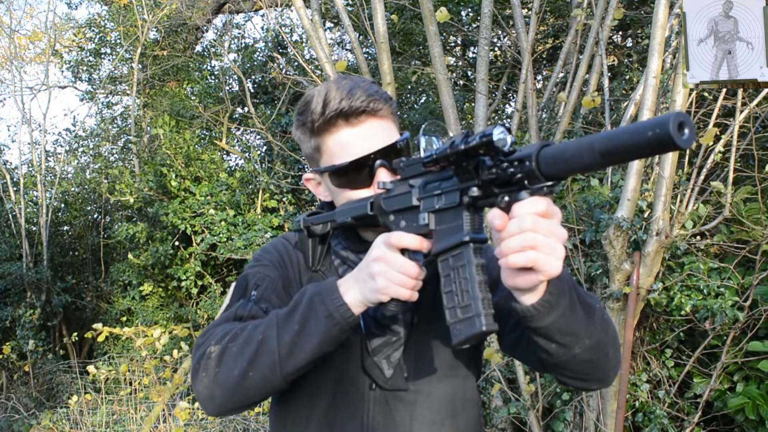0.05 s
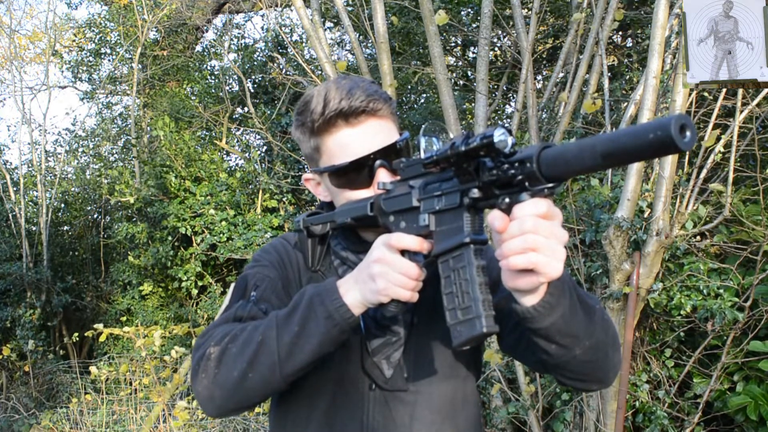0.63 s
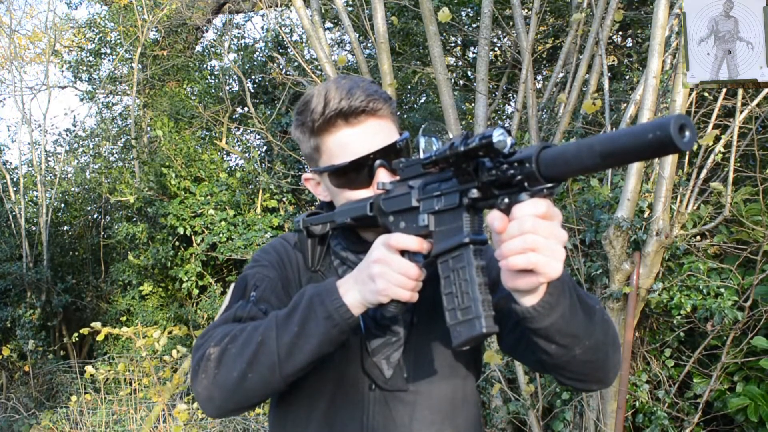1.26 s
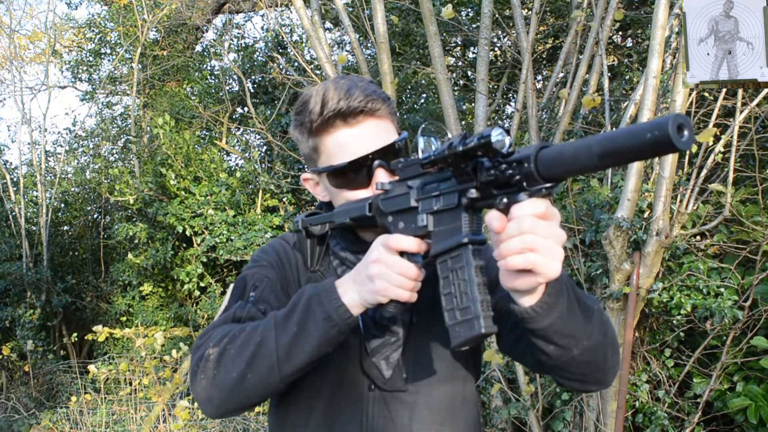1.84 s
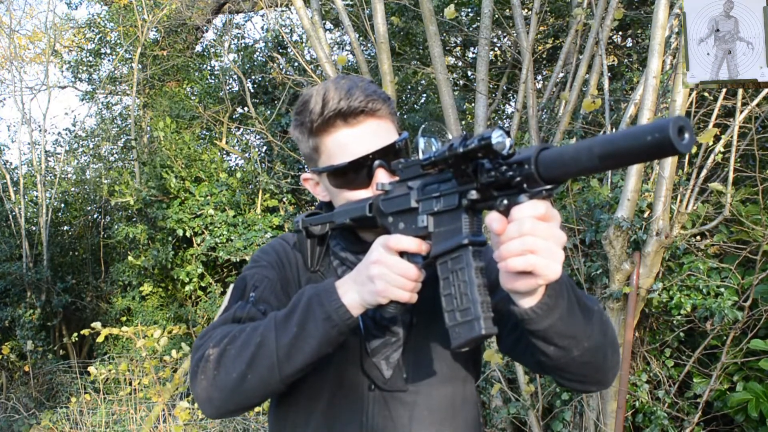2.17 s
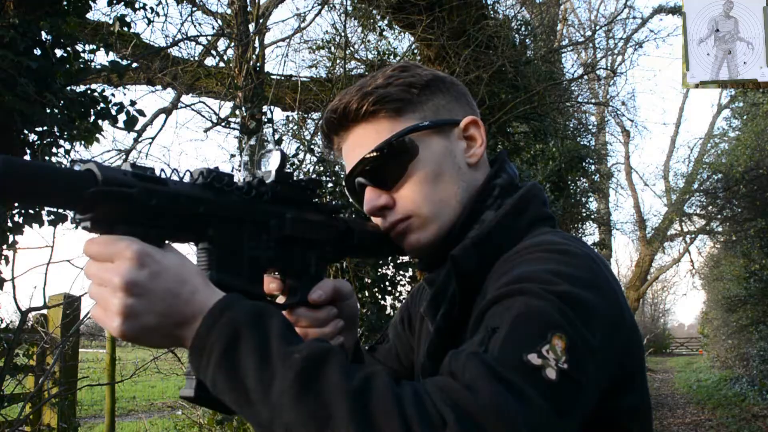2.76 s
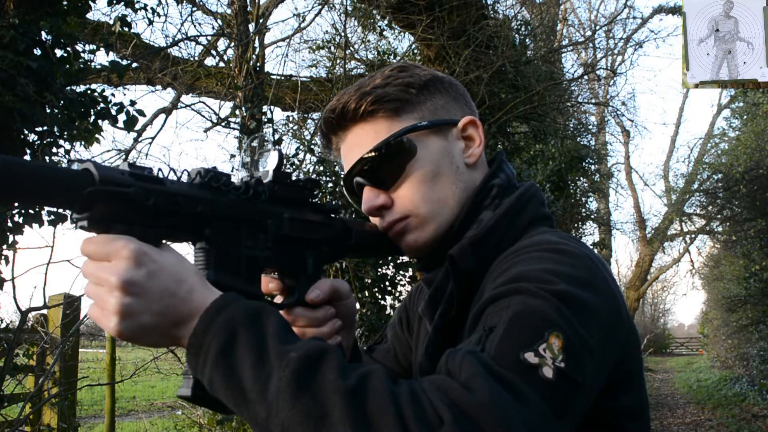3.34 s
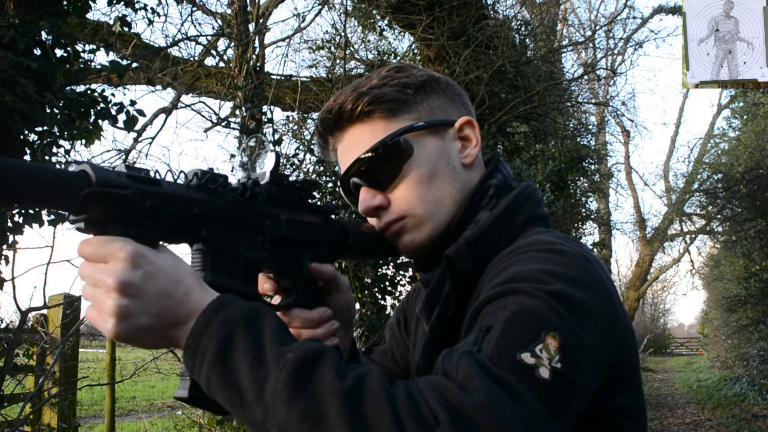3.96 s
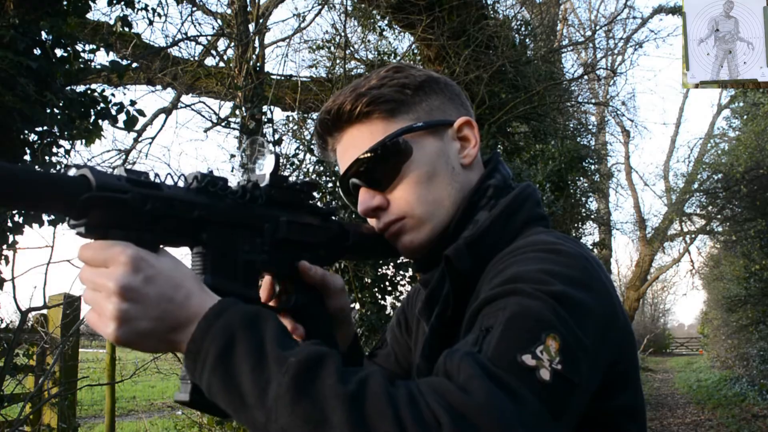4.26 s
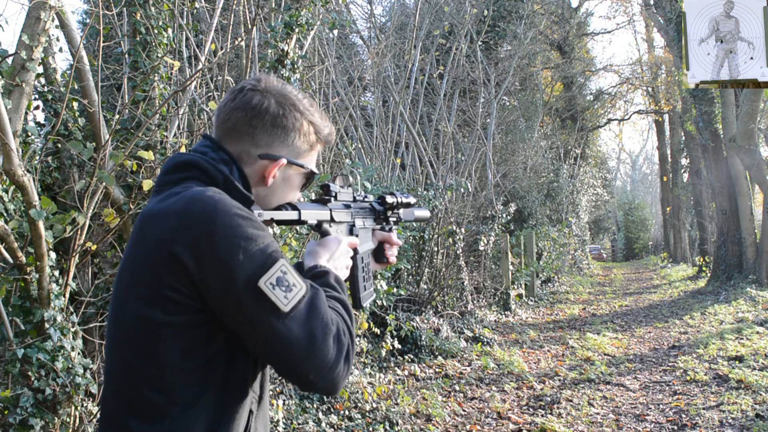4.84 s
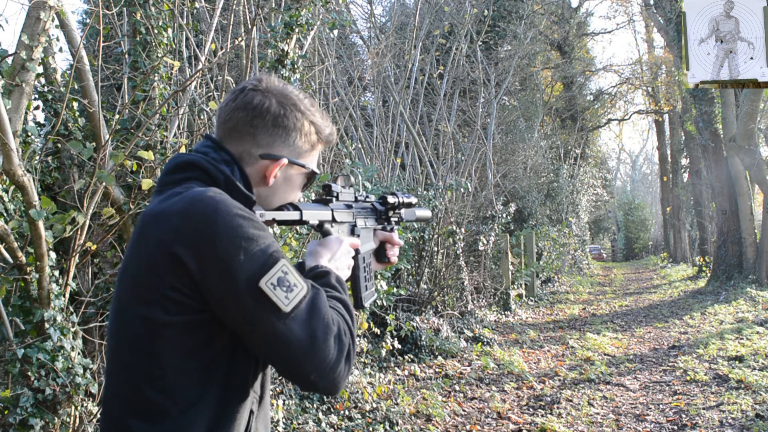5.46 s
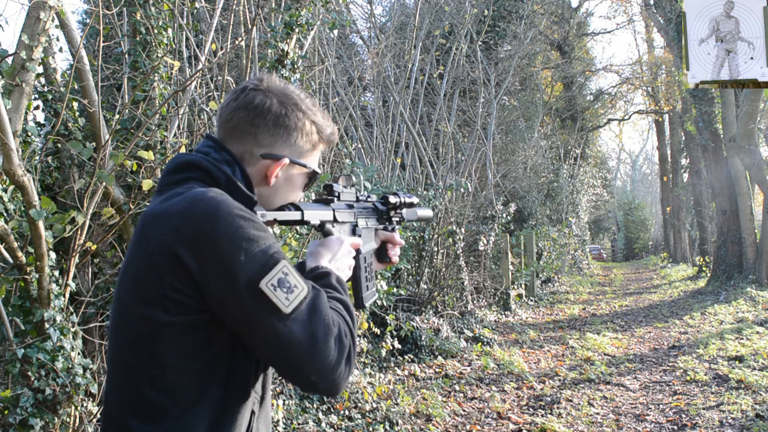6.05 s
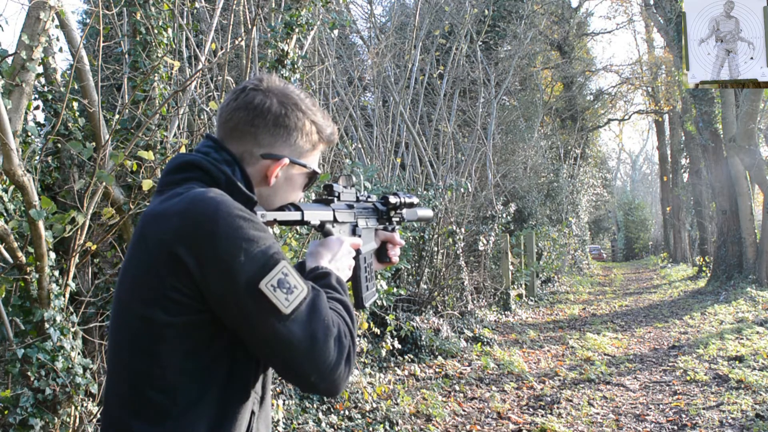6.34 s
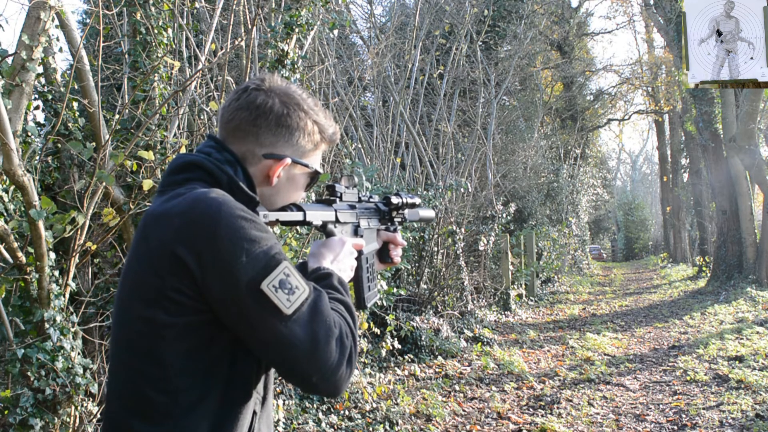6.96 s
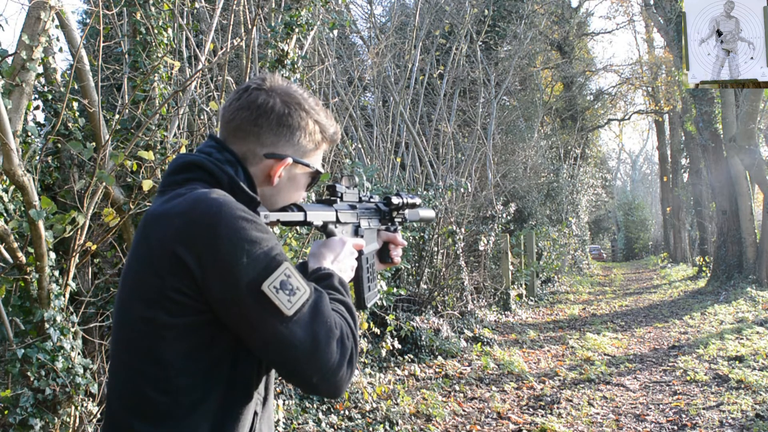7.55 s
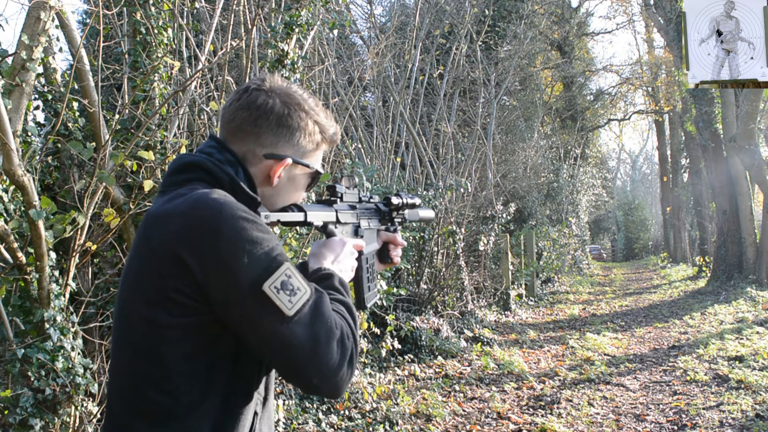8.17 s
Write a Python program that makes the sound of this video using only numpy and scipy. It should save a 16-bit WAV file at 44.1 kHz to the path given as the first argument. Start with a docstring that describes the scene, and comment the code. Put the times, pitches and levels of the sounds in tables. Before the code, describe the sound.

Close airsoft rifle snaps with a gear whir, first singly and then in automatic bursts, with metal target clinks and gusty wind outdoors.

```python
"""Electric airsoft rifle firing at a steel plate in a wood: six single shots heard from the front,
then three bursts from behind. Each cycle, gears wind a spring and the piston slams home.
Pellets crack on the plate and ring it, mostly about 0.25 s after a shot. Trees scatter the sound,
wind buffets the two microphone ports, and the loudest blows overload the recorder."""
import sys
import numpy as np
from scipy import signal
from scipy.fft import rfft, irfft, next_fast_len
from scipy.io import wavfile
from scipy.ndimage import map_coordinates

SR = 44100
rng = np.random.default_rng(int(sys.argv[2]) if len(sys.argv) > 2 else 0)


def dump(signal):
    """Clip the signal to [-1, 1] and save it as 16-bit WAV at the path in sys.argv[1]."""
    limited = np.clip(np.atleast_2d(signal).T, -1, 1)
    pcm = np.round(limited * 32767).astype(np.int16)
    wavfile.write(sys.argv[1], SR, pcm)


N = 362061
TIME_S = np.arange(N) / SR
AGE_S = TIME_S[:int(.6 * SR)]  # time since a blow
TOP_HZ = 16000

# Table levels are relative.
# piston slams, one per trigger pull: (time [s])
SINGLE_SHOTS = [0.492, 1.209, 1.897, 2.54, 3.054, 3.611]
# trigger held: (first slam [s], shots [count])
AUTO_BURSTS = [(5.425, 5), (6.675, 5), (7.967, 3)]
# gearbox shell and barrel modes: (frequency [Hz], level [dB], t60 [s])
SHELL_MODES = [(177, -14.5, 0.043), (383, -11, 0.025), (603, -6.5, 0.026), (1123, -2, .026),
               (1271, -7.5, 0.042), (1484, -4, 0.028), (1884, -4, 0.024), (2900, -10.5, 0.019)]
# muzzle crack, spring buzz, selector click: (frequency [Hz], density [dB])
MUZZLE_SPECTRUM = [(300, -10), (1500, 8), (3000, -4), (6500, -9), (9300, 2.5), (12000, -17), (16000, -31.5)]
SPRING_SPECTRUM = [(300, -24), (800, -5), (2000, -1), (4500, -10.5), (7000, -4), (9500, -2), (12000, -15.5),
                   (15500, -27)]
SELECTOR_SPECTRUM = [(1000, -48.5), (3300, -16.5), (6500, 1), (9500, 1), (12500, -16), (14500, -8),
                     (16500, -24)]
# winding stroke: (position [0-1], tooth rate [Hz], level [dB])
WINDING_STROKE = [(0, 1520, 0), (.25, 1620, 1.5), (.6, 1450, 0.5), (1, 1237, 2)]
# gear noise, front and rear: (frequency [Hz], density [dB])
GEAR_FRONT_SPECTRUM = [(260, -43.5), (450, -8.5), (530, -12.5), (759, -0.5), (1140, -7), (1460, -6.5),
                       (1670, -5), (2740, -10.5), (3000, -8.5), (3430, -12), (4560, -8.5), (5610, -19.5),
                       (10500, -13.5), (16000, -51)]
GEAR_REAR_SPECTRUM = [(180, -56), (300, -45), (447, -41), (564, -2.5), (736, 1.5), (1120, -6), (1430, 0.5),
                      (3240, -6.5), (4440, -2), (5420, -10), (6950, -12), (7810, -5.5), (11800, -18.5),
                      (14500, -36.5), (16000, -50.5)]
# impacts: (time [s], crack [dB], centre ring [dB], rim ring [dB], crack centre [Hz], rim focus [Hz])
PELLET_HITS = [(0.104, -7.5, -17, -51, 6130, 2470), (0.727, -20.5, -65, -61, 3780, 2980),
               (1.457, -4.5, -20, -24, 6140, 3070), (2.144, -6.5, -24, -21, 4870, 3780),
               (2.775, -12, -28, -24, 3600, 1330), (3.335, -9.5, -38, -14.5, 5865, 900),
               (3.893, -9.5, -36.5, -18, 3980, 1250), (5.680, -11.5, -55, -16, 4500, 3700),
               (5.788, -18, -47, -21, 5000, 3000), (5.895, -13.5, -42.5, -31, 2400, 2010),
               (6.007, -18, -61, -28, 3960, 3300), (6.110, -10.5, -24.5, -18.5, 7600, 6440),
               (6.929, -8, -24.5, -21, 5996, 3060), (7.037, -6.5, -19.5, -20.5, 6490, 6010),
               (7.145, -10.5, -19, -22, 6030, 2800), (7.254, -12.5, -58, -32, 2170, 1900),
               (7.361, -12, -55.5, -46, 2200, 2000), (7.375, -20.5, -47, -29, 9100, 1720)]
# steel plate: (frequency [Hz], level [dB], t60 [s], off-centre share [0-1])
PLATE_MODES = [(774, 3, 0.68, 0), (909, -3.5, .35, 0.8), (1217, -9.5, 0.43, 1), (1570, -7, 0.095, 0.95),
               (1690, -6, .22, 0.85), (1746, -6, 0.39, 0.9), (1863, -10.5, 0.59, 0.8),
               (2007, -10.5, 0.47, 0.95), (2250, -17.5, 1, 0.12), (2600, -1.5, 0.11, 1),
               (2970, -10, .25, 0.95), (3210, -4.5, 0.17, 0.93), (3380, -9, 0.13, 0.93),
               (3640, -13, 0.18, 0.92), (3690, -3, 0.11, 0.7), (4340, -14, 0.088, 0.97),
               (5144, 7, 0.083, 0.2), (5400, -15.5, .08, 0.93), (7640, 5.5, 0.11, 0.5),
               (8260, -21, 0.31, 0.01), (8680, -3, 0.17, 0.6), (9300, -7, .15, 1), (9570, -9, 0.16, 0.96)]
# tree echo colour: (frequency [Hz], level [dB])
ECHO_SPECTRUM = [(300, -22.5), (800, -4), (1700, -1), (9000, -2), (12000, 4.5), (16000, -17)]
# tree echo decay: (frequency [Hz], t60 [s])
ECHO_DECAY = [(200, 0.18), (1500, 0.53), (4000, 0.52), (9000, 0.46), (15000, 0.21)]
# gusts and lulls: (time [s], level [dB])
GUSTS = [(0.0, -20), (0.32, -32), (0.44, -56), (0.64, -25.5), (1.08, -20.5), (2.44, -29.5), (2.54, -40),
         (2.86, -17.5), (3.9, -20.5), (4.06, -28.5), (4.52, -33.5), (4.82, -24.5), (4.9, -62),
         (5.02, -57.5), (5.32, -32.5), (6.02, -25), (6.34, -36), (6.4, -24), (7.04, -52), (7.1, -25),
         (7.54, -56), (7.96, -54), (8.02, -49), (8.2, -46)]
# turbulence on the ports: (frequency [Hz], density [dB])
BUFFET_SPECTRUM = [(15, -57.5), (25, -37.5), (86, -3), (216, -0.5), (447, -7), (715, -18), (788, -27),
                   (827, -21.5), (882, -24.5), (1200, -36.5), (1560, -58.5), (2640, -120)]
# hardest eddies: (time [s], level [dB], pitch [Hz])
EDDY_THUDS = [(0.815, -10, 283), (1.359, -12, 217), (1.574, -13, 207), (2.879, -8.5, 218), (3.004, -5, 294),
              (3.159, -5, 370), (3.87, -6, 208), (4.815, -11, 232), (6.018, -13, 158), (6.427, -14, 160)]
# distant woodland: (frequency [Hz], density [dB])
WOODLAND_SPECTRUM = [(15, -56), (25, -20.5), (76, -5.5), (427, -8.5), (795, -3), (862, -5), (1400, -12),
                     (1990, -18), (2220, -19.5), (3330, -24), (14300, -39.5), (16000, -47.5)]


def piston(shots_s, force_db, thump_db, blast_db, crack_db, spring_db, catch_db, release_db,
           rebound_db, spring_t60_s):
    """Teeth catch and release the piston; it hits the cylinder head, air cracks, the spring buzzes."""
    def tick(t60_s):
        """Short noise burst."""
        return noise(MUZZLE_SPECTRUM, len(AGE_S)) * decay(t60_s)

    def knock():
        """Shell modes; neighbours swing in opposite senses."""
        return sum((-1) ** k * amp(db + rng.normal(0, 1.5)) * ring(hz * rng.normal(1, .038), t60_s)
                   for k, (hz, db, t60_s) in enumerate(SHELL_MODES))

    out = np.zeros(N)
    for slam_s in shots_s:
        force = amp(force_db + rng.normal(0, .5))
        buzz = noise(SPRING_SPECTRUM, len(AGE_S)) * decay(spring_t60_s) * (1 - np.exp(-AGE_S / .0085))
        add(out, slam_s - .091, amp(catch_db) * (tick(.035) + knock()))
        add(out, slam_s - .0055, amp(release_db) * (.5 * tick(.017) + knock()))
        add(out, slam_s + .0007, force * (amp(thump_db) * knock() + amp(blast_db) * tick(.027)))
        add(out, slam_s + .0038, force * amp(crack_db) * tick(.0052))
        add(out, slam_s + .0071, force * amp(crack_db - 1.5) * tick(.0037))
        add(out, slam_s + .004, amp(spring_db) * buzz)
        add(out, slam_s + rng.normal(.028, .003), amp(rebound_db) * tick(.011))
    return out


def gears(shots_s, spectrum, level_db, whine_db, whine_hz, mesh_db, cycle_s, spin_up_s, stop_t60_s,
          rough_db, flutter):
    """The gear train grinds for one cycle before each slam, slowing as the spring tightens."""
    drive, stroke = np.zeros(N), np.zeros(N)
    position, rate_hz, load_db = np.transpose(WINDING_STROKE)
    for slam_s in shots_s:
        span = slice(int((slam_s - cycle_s - spin_up_s) * SR), int((slam_s + .15) * SR))
        t_s = TIME_S[span] - slam_s
        progress = 1 + t_s / cycle_s
        spin_up = np.clip((t_s + cycle_s + spin_up_s) / spin_up_s, 0, 1) ** 2
        turning = spin_up * amp(-60 * np.maximum(t_s, 0) / stop_t60_s)
        drive[span] = np.maximum(drive[span], turning * amp(np.interp(progress, position, load_db)))
        stroke[span] = np.where(t_s > -cycle_s, np.clip(progress, 0, 1), stroke[span])
    tooth_hz = np.interp(stroke, position, rate_hz)
    phase = 2 * np.pi * np.cumsum(tooth_hz * (1 + .01166 * wobble(300))) / SR
    grind = unit_rms(noise(spectrum, N) * (1 + .29 * np.cos(phase)) * amp(rough_db * wobble(400)))
    # the pinion whines in a casing resonance: little sag under load
    sag = (tooth_hz / rate_hz[2]) ** .12
    pitch_hz = whine_hz * sag * (1 + .014 * wobble(40) + flutter * wobble(1500))
    whine = amp(whine_db + 3 * wobble(150)) * np.sin(2 * np.pi * np.cumsum(pitch_hz) / SR)
    mesh = amp(mesh_db + 2.8 * wobble(160)) * np.sin(phase)
    tooth_load = np.abs(np.sin(np.pi * stroke))
    return amp(level_db) * drive * (grind + tooth_load * whine + np.sqrt(tooth_load) * mesh)


def selector(time_s, level_db):
    """The fire selector snaps to automatic."""
    out = np.zeros(N)
    envelope = decay(.0051) + amp(-29) * decay(.13)
    add(out, time_s, amp(level_db) * noise(SELECTOR_SPECTRUM, len(AGE_S)) * envelope)
    return out


def pellets(crack_db, centre_gain_db, rim_gain_db, crack_t60_s, crack_width_oct, rattle_db,
            rattle_t60_s, rim_width_oct, rim_damping, jangle, contact_hz):
    """Pellets crack on the plate; modes with a central node ring only on off-centre hits."""
    out = np.zeros(N)
    envelope = .61 * decay(.0046) + decay(crack_t60_s) + amp(rattle_db) * decay(rattle_t60_s)
    for hit_s, hit_db, centre_db, rim_db, crack_hz, rim_hz in PELLET_HITS:
        # rim hits shake the plate against its mount: shorter ring
        t60_scale = 1 - rim_damping / (1 + amp(centre_db - rim_db) ** 2)
        # contact time limits the treble
        crack = filtered(rng.standard_normal(len(AGE_S)),
                         lambda hz: bell(hz + 1, crack_hz, crack_width_oct) * lowpass(hz, contact_hz, 8))
        sound = amp(hit_db + crack_db) * unit_rms(crack) * envelope
        for hz, db, t60_s, off_centre in PLATE_MODES:
            rim = amp(rim_db + rim_gain_db + rng.normal(0, 2)) * bell(hz, rim_hz, rim_width_oct)
            push = (1 - off_centre) * amp(centre_db + centre_gain_db) + off_centre * rim
            # the loose plate jangles, blurring high modes and rim modes most
            drift_rad = jangle * (1 + off_centre) * np.cumsum(rng.standard_normal(len(AGE_S))) * hz / SR
            sound += push * amp(db) * ring(hz, t60_s * t60_scale, drift_rad)
        add(out, hit_s, sound)
    return out


def trees(x, wet_db, rise_s, spread):
    """Trunks and hedges scatter a thin tail; only its treble differs between the close ports."""
    hz, t_s, bins = signal.stft(rng.standard_normal((2, len(AGE_S))), SR, nperseg=256)
    bins *= amp(log_interp(ECHO_SPECTRUM, hz)[:, None] - 60 * t_s / log_interp(ECHO_DECAY, hz)[:, None])
    tail = signal.istft(bins, SR, nperseg=256)[1][:, :len(AGE_S)]
    tail *= (1 - np.exp(-AGE_S / rise_s)) * (1 + 2 * decay(.23))
    mid, side = signal.fftconvolve(x[None], tail / np.linalg.norm(tail[0]), axes=1)[:, :N]
    side = filtered(side, lambda hz: spread * (hz / TOP_HZ) ** 1.9)
    return amp(wet_db) * np.array([mid + side, mid - side])


def wind(level_db, flurry_db, flurry_hz, lump_db, low_cut_hz, spikiness, soften_s, soften_fade_s):
    """Turbulence hits each port separately; brisk flapping turns to soft rumble at soften_s."""
    gust_db = np.interp(TIME_S, *np.transpose(GUSTS)) + flurry_db * wobble(flurry_hz)
    rumble = filtered(noise(BUFFET_SPECTRUM, (2, N)), lambda hz: hz / np.hypot(hz, low_cut_hz))
    deep = filtered(rumble, lambda hz: lowpass(hz, 250, 4))
    bass = filtered(deep, lambda hz: lowpass(hz, 120, 4))
    briskness = np.interp((TIME_S - soften_s) / soften_fade_s, [-.5, .5], [1, .2])
    lumps = unit_rms(amp(lump_db * np.array([wobble(70), wobble(70)])))
    low = lumps * (deep - .44 * briskness * bass)  # brisk wind moves the rumble up
    high = briskness * unit_rms(lumps ** spikiness) * (rumble - deep)  # hardest lumps reach highest
    return amp(level_db + gust_db) * unit_rms(low + high)


def eddies(level_db, width_cycles):
    """A hard eddy thuds for a cycle or two, differently at each port."""
    out = np.zeros((2, N))
    for time_s, db, hz in EDDY_THUDS:
        width_s = width_cycles / hz
        envelope = amp(db + level_db) * np.exp(-(AGE_S / width_s - 2.5) ** 2)
        for port in out:
            swing = np.sin(2 * np.pi * (hz * rng.normal(1, .19) * AGE_S + rng.random()))
            add(port, time_s - 2 * width_s, envelope * swing)
    return out


def woodland(level_db):
    """Steady far-off rush, nearly alike at both ports."""
    return amp(level_db) * (noise(WOODLAND_SPECTRUM, N) + .25 * noise(WOODLAND_SPECTRUM, (2, N)))


def ports(x, lag_samples):
    """Sound reaches the left port after the right."""
    return filtered(x, lambda hz: np.exp(1j * np.pi * hz / SR * lag_samples * np.array([[-1], [1]])))


def amp(db):
    """dB to gain."""
    return 10 ** (np.asarray(db) / 20)


def unit_rms(x):
    """Scale to rms 1."""
    return x / np.sqrt(np.mean(x ** 2) + 1e-20)


def log_interp(points, hz):
    """Read (frequency [Hz], value) points on a log axis."""
    knots_hz, values = np.transpose(points)
    return np.interp(np.log(hz + 1), np.log(knots_hz + 1), values)


def lowpass(hz, corner_hz, order):
    """Low-pass gain, 0.5 at the corner."""
    return 1 / (1 + (hz / corner_hz) ** order)


def bell(hz, centre_hz, width_oct):
    """Band-pass gain, 0.5 at width_oct either side."""
    return 1 / (1 + (np.log2(hz / centre_hz) / width_oct) ** 2)


def filtered(x, response):
    """Apply response(hz) by FFT."""
    n = x.shape[-1]
    padded = next_fast_len(n + 4096)
    return irfft(rfft(x, padded) * response(np.fft.rfftfreq(padded, 1 / SR)), padded)[..., :n]


def noise(spectrum, shape):
    """Coloured noise, rms 1."""
    return unit_rms(filtered(rng.standard_normal(shape), lambda hz: amp(log_interp(spectrum, hz))))


def wobble(rate_hz):
    """Smooth random curve."""
    knots = rng.standard_normal(int(TIME_S[-1] * rate_hz) + 4)
    return map_coordinates(knots, [TIME_S * rate_hz], order=2)


def decay(t60_s):
    """Exponential envelope."""
    return amp(-60 * AGE_S / t60_s)


def ring(hz, t60_s, phase_rad=0):
    """One damped mode."""
    return np.sin(2 * np.pi * hz * AGE_S + phase_rad) * decay(t60_s)


def add(track, start_s, sound):
    """Mix a sound into a track in place."""
    span = track[max(round(start_s * SR), 0):][:len(sound)]
    span += sound[:len(span)]


def scene():
    """Rifle and target among trees, with wind; stereo."""
    auto_period_s = .1087
    auto_shots_s = [first_s + k * auto_period_s for first_s, count in AUTO_BURSTS for k in range(count)]
    front = gears(SINGLE_SHOTS, GEAR_FRONT_SPECTRUM, level_db=-19, whine_db=-7.5, whine_hz=4650,
                  mesh_db=-4.5, cycle_s=.092, spin_up_s=.03, stop_t60_s=.12, rough_db=2, flutter=.014)
    front += piston(SINGLE_SHOTS, force_db=4, thump_db=-1, blast_db=-2.5, crack_db=-1.5,
                    spring_db=-16.5, catch_db=-16, release_db=-13, rebound_db=-22, spring_t60_s=.22)
    rear = gears(auto_shots_s, GEAR_REAR_SPECTRUM, level_db=-22.5, whine_db=-4.5, whine_hz=4390,
                 mesh_db=-28, cycle_s=.093, spin_up_s=.032, stop_t60_s=.07, rough_db=2.5, flutter=.0161)
    rear += piston(auto_shots_s, force_db=1.4, thump_db=-3.5, blast_db=-10.5, crack_db=-3,
                   spring_db=-15.5, catch_db=-38, release_db=-17.5, rebound_db=-10.5, spring_t60_s=.23)
    rifle = front + rear + selector(time_s=4.3995, level_db=-10.5)
    target = pellets(crack_db=-1.5, centre_gain_db=.5, rim_gain_db=4, crack_t60_s=.018,
                     crack_width_oct=1, rattle_db=-15.5, rattle_t60_s=.09, rim_width_oct=1.27,
                     rim_damping=.46, jangle=.55, contact_hz=13000)
    direct = ports(rifle, lag_samples=.073) + ports(target, lag_samples=.43)
    echo = trees(rifle, wet_db=-22, rise_s=.0075, spread=3.2)
    echo += trees(target, wet_db=-6.5, rise_s=.0047, spread=1.8)
    buffet = wind(level_db=-2.5, flurry_db=1.5, flurry_hz=11, lump_db=4, low_cut_hz=17,
                  spikiness=2.04, soften_s=3.85, soften_fade_s=.5)
    return direct + echo + buffet + eddies(level_db=-1.5, width_cycles=.9) + woodland(level_db=-47.5)


def record(dry):
    """Recorder: 60 Hz high-pass, soft clip at full scale, band limit."""
    thinned = filtered(dry, lambda hz: 1j * hz / (1j * hz + 60))
    clipped = thinned / (1 + np.abs(thinned) ** 12) ** (1 / 12)
    return filtered(clipped, lambda hz: lowpass(hz, TOP_HZ, 100))


dry = scene()
out = record(dry)
dump(out)
```